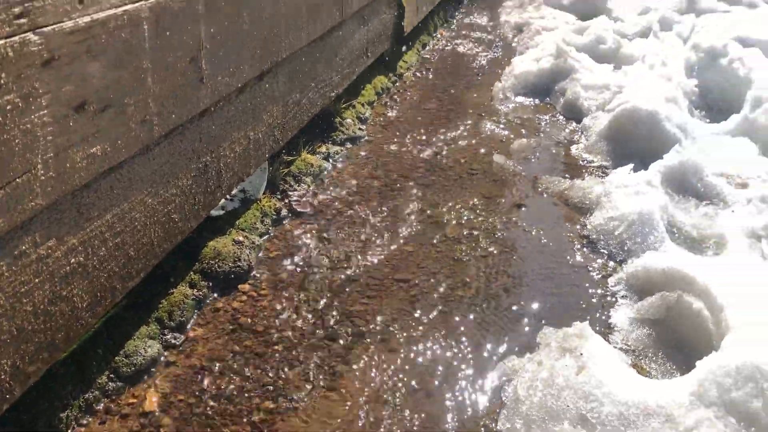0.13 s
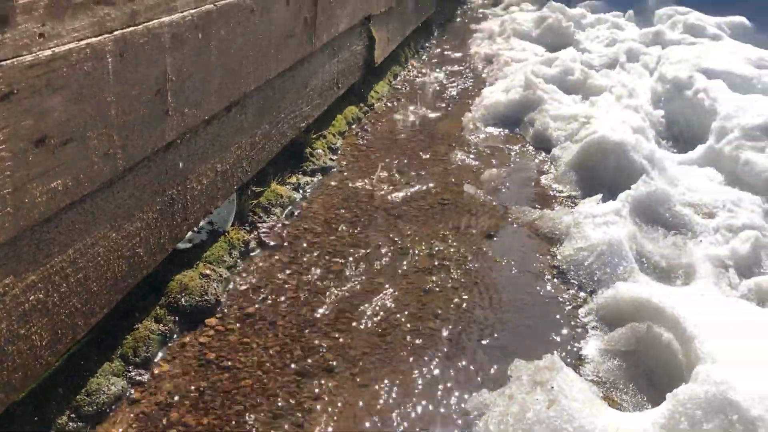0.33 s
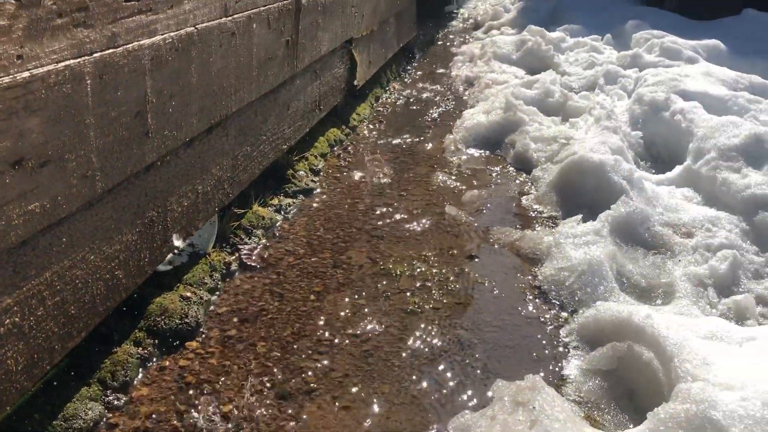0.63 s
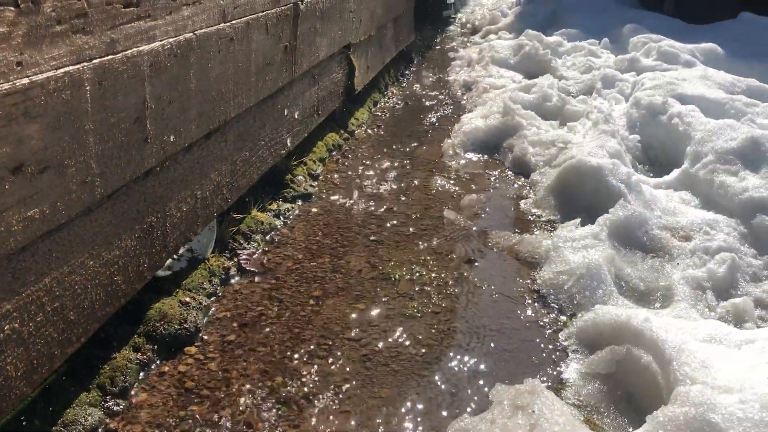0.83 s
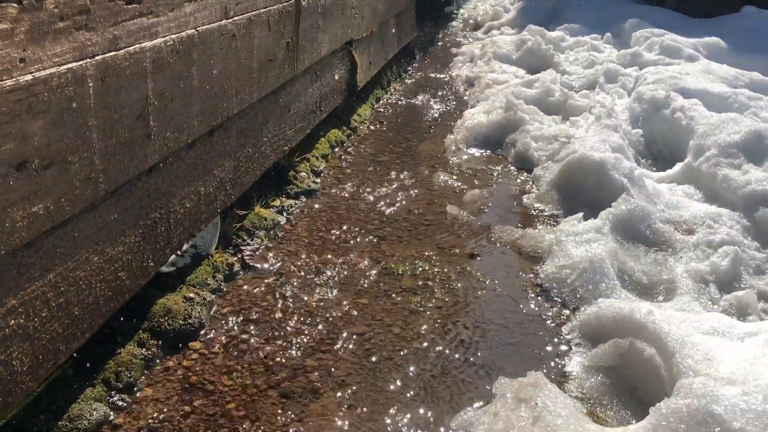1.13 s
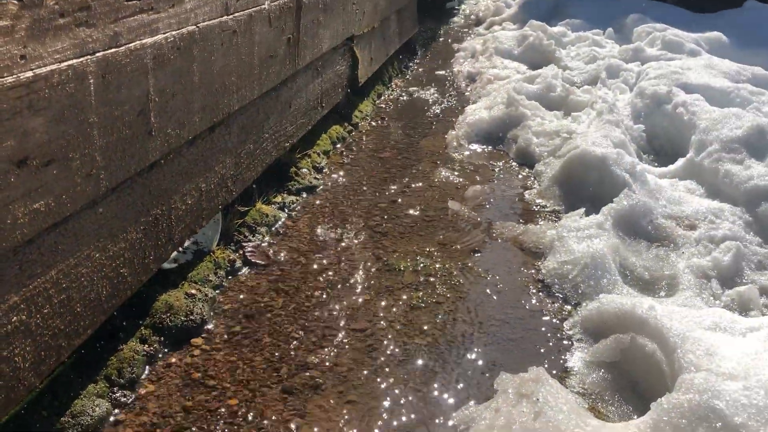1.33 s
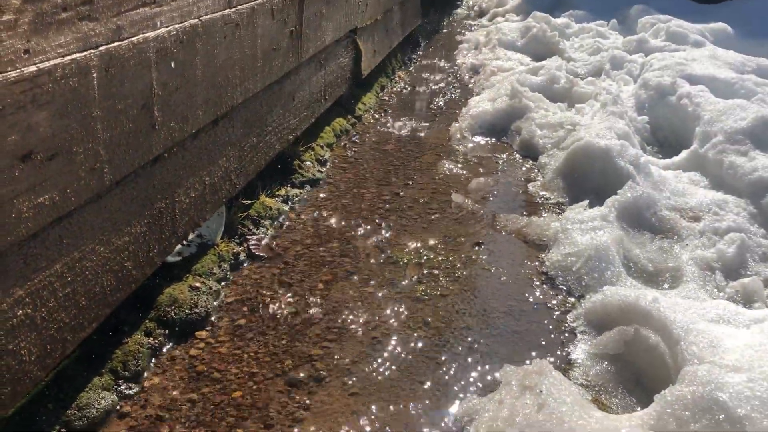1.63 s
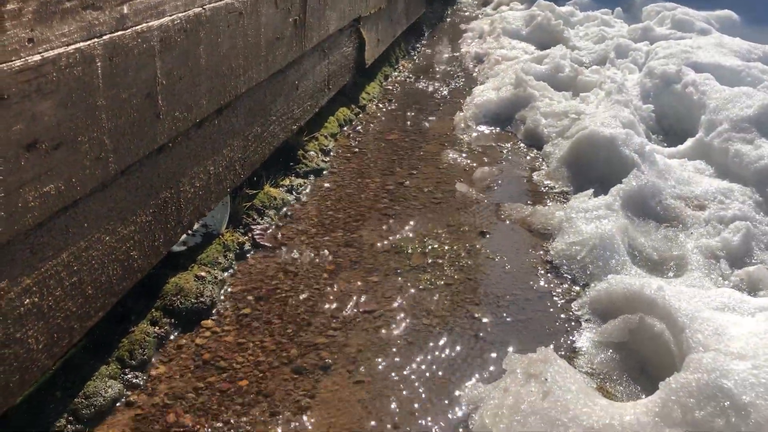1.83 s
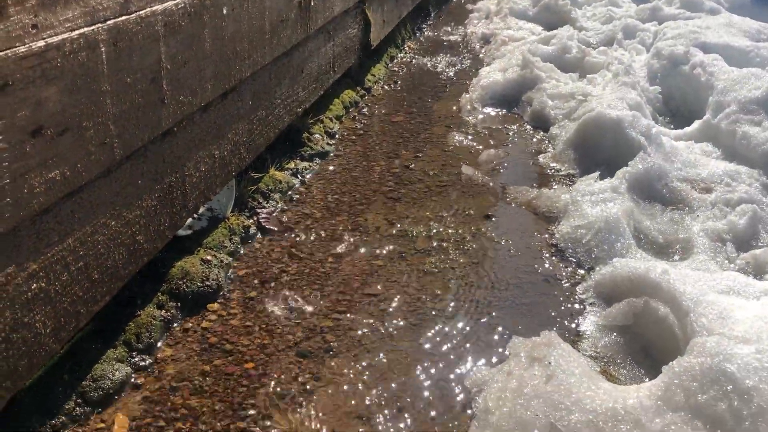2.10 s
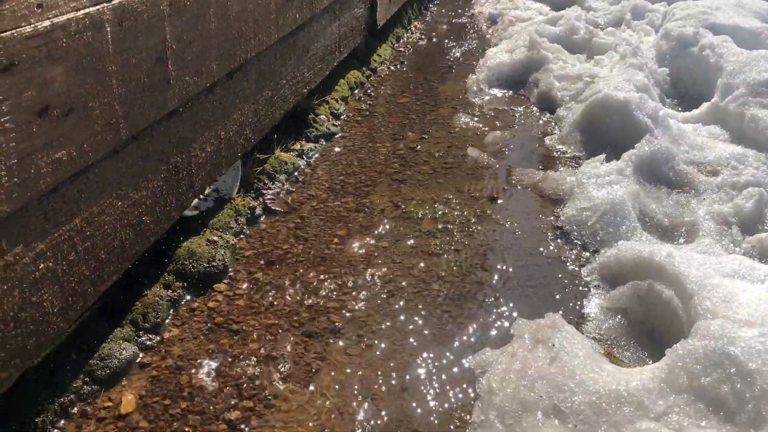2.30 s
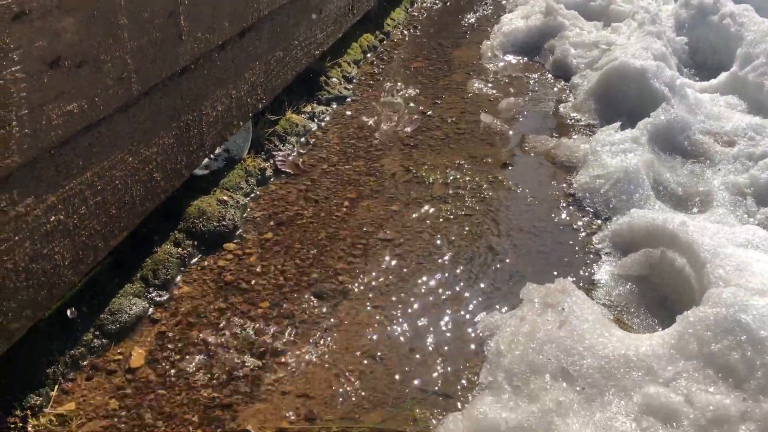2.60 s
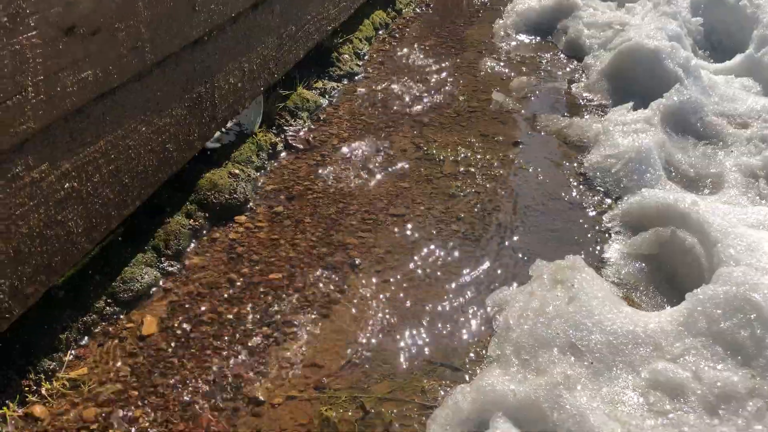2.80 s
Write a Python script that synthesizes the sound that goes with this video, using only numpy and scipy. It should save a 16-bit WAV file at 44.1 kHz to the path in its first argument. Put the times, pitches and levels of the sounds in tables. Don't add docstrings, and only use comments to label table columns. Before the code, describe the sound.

Meltwater drips rapidly into a shallow pebbly channel, crisp ticks and plinks, with faint birds

```python
import sys
import numpy as np
from scipy import signal
from scipy.fft import rfft, irfft
from scipy.io import wavfile
from scipy.ndimage import uniform_filter1d, map_coordinates

SR = 44100
rng = np.random.default_rng(int(sys.argv[2]) if len(sys.argv) > 2 else 0)


def to_wav(sig):
    pcm = np.clip(np.atleast_2d(sig), -1, 1) * 32767
    pcm = np.round(pcm).astype(np.int16)
    wavfile.write(sys.argv[1], SR, pcm.T)


def convert_level_to_amplitude(level_db):
    exponent = np.asarray(level_db, float) / 20
    return 10 ** exponent


N = 130095


def unit(x):
    return x / np.sqrt(np.mean(x ** 2) + 1e-20)


def along(points, hz):
    f, value = np.transpose(points)
    return np.interp(np.log(hz + 1), np.log(f + 1), value)


def wobble(rate):
    knots = rng.standard_normal(int(N * rate / SR) + 4)
    return map_coordinates(knots, [np.arange(N) * rate / SR])


def coloured(x, spectrum):
    m = 2 ** 12
    gain = convert_level_to_amplitude(along(spectrum, np.fft.rfftfreq(m, 1 / SR)))
    cepstrum = irfft(np.log(gain + 1e-6), m)
    cepstrum[1:m // 2] *= 2
    cepstrum[m // 2 + 1:] = 0
    response = irfft(np.exp(rfft(cepstrum)), m)[:m // 2]
    return signal.fftconvolve(x, response)[:N]


def rush(spectrum, patchy_db):
    z = signal.stft(rng.standard_normal(N + 512), nperseg=512)[2]
    patches = uniform_filter1d(rng.standard_normal(z.shape), size=6, axis=0)
    patches = uniform_filter1d(patches, size=10, axis=1)
    x = signal.istft(z * convert_level_to_amplitude(patchy_db * unit(patches)), nperseg=512)[1][:N]
    gain = convert_level_to_amplitude(along(spectrum, np.fft.rfftfreq(N, 1 / SR)))
    return unit(irfft(rfft(x) * gain, N))


def placed(s, grains):
    at = np.round(np.asarray(s) * SR).astype(int)[:, None] + np.arange(grains.shape[1])
    return np.bincount(at.ravel(), grains.ravel(), N + SR)[:N]


# pitch in Hz, loudness in dB per Hz of the road.
ROAD_COLOUR = [(120, -11.5), (200, -6), (333, -14), (530, -6.5), (657, -3.5), (882, 0), (1450, -13),
               (2710, -25.5), (3000, -31.5), (3900, -25), (6600, -120)]


def road():
    level_db = -55.5 + 0.41 * wobble(9.71)
    return convert_level_to_amplitude(level_db) * rush(ROAD_COLOUR, patchy_db=1.44)


# pitch in Hz, loudness in dB per Hz of the far water.
FAR_WATER_COLOUR = [(1290, -26), (2200, -14), (2770, -11.5), (5690, -5), (6490, -1), (7100, -10),
                    (7970, -1), (10800, -19.5), (15600, -18)]


def far_water():
    level_db = -66 + wobble(6) + 3.8 * wobble(180)
    return convert_level_to_amplitude(level_db) * rush(FAR_WATER_COLOUR, patchy_db=1.5)


# time in seconds, strength of the breeze in dB.
BREEZE_STRENGTH = [
    (0.0, -63),
    (0.35, -59.5),
    (.55, -71),
    (.8, -62.5),
    (1.3, -65.5),
    (1.6, -61.5),
    (1.82, -66),
    (2.1, -59.5),
    (2.55, -68),
    (2.95, -63.5),
]


def gust_db(s):
    return np.interp(s, *np.transpose(BREEZE_STRENGTH))


# pitch in Hz, loudness in dB per Hz of the wind rumble.
RUMBLE_COLOUR = [(16, -79), (30, -29), (71, -9.5), (114, -3), (269, -21), (330, -38), (430, -39),
                 (730, -120)]


def rumble():
    return convert_level_to_amplitude(-3 + gust_db(np.arange(N) / SR)) * rush(RUMBLE_COLOUR, patchy_db=4.5)


def puffs(s, db, pitch_spread):
    swings = 2.57
    hz = 118.8 * (1 + pitch_spread * rng.standard_normal(len(s))).clip(.5)
    u = np.arange(4000) / SR * hz[:, None] / swings
    thud = np.sin(2 * np.pi * swings * u) * u ** 2 * np.exp(-5.5 * u)
    thud *= convert_level_to_amplitude(db)[:, None] / np.abs(thud).max(axis=1, keepdims=True)
    return placed(s, thud)


def flutter(count=95):
    late = 0.303 * rng.standard_normal(count)
    s = np.abs(np.arange(count) + late) * N / SR / count
    db = gust_db(s) + 8.5 + 3.5 * rng.standard_normal(count)
    return puffs(s, db, pitch_spread=.25)


# start in seconds, peak level in dB.
BREEZE_THUDS = [(0.079, -40), (0.368, -41), (0.716, -42.5), (1.029, -47), (1.531, -38.5), (1.586, -45),
                (1.679, -40), (1.889, -42), (1.977, -42.5), (2.433, -44), (2.641, -49), (2.809, -43.5)]


def thuds():
    s, db = np.transpose(BREEZE_THUDS)
    return puffs(s, db - 2.5, pitch_spread=.07)


def bubbles(s, hz, db, cycles, size):
    rise, attack_s = 0.047, 0.00016
    t, hz = np.arange(size) / SR, hz[:, None]
    u = t * hz / cycles
    tone = np.sin(2 * np.pi * hz * t * (1 + rise * u))
    ring = tone * convert_level_to_amplitude(-60 * u) * (1 - np.exp(-t / attack_s))
    return placed(s, convert_level_to_amplitude(db)[:, None] * ring / np.abs(ring).max(axis=1, keepdims=True))


# pitch in Hz, gain in dB of a crack as it reaches the microphone.
CRACK_COLOUR = [(1200, -30), (2600, -1), (5000, 4), (6400, 8), (7050, -3), (7900, 7), (10500, -2),
                (15500, -3.5)]


def cracks(s, db, size):
    crack_t60_s, spray_t60_s, spray_db = .0036, .03, -19
    t = np.arange(size) / SR
    shape = convert_level_to_amplitude(-60 * t / crack_t60_s) + convert_level_to_amplitude(spray_db - 60 * t / spray_t60_s)
    burst = shape * rng.standard_normal((len(s), size))
    burst *= np.linalg.norm(shape) / np.linalg.norm(burst, axis=1, keepdims=True)
    return coloured(placed(s, convert_level_to_amplitude(db)[:, None] * burst), CRACK_COLOUR)


def patter(count=800):
    when, size, tone, shine = rng.random((count, 4)).T
    s = when * N / SR
    db = -71.5 - 2.5 * np.log(1 - .97 * size)
    hz = 6660 * 2 ** (1.8 * (tone - .5))
    ring = coloured(bubbles(s, hz, db - 8 * shine, cycles=22, size=400), CRACK_COLOUR)
    return ring + cracks(s, db - 0.5 - 8 * (1 - shine), size=700)


def flock(calls, shake, bend):
    direct, echo_t60_s, far_echo_db, far_echo_t60_s = .3, .15, -20, .6
    t = np.arange(SR // 3) / SR
    echo_fade = convert_level_to_amplitude(-60 * t / echo_t60_s) + convert_level_to_amplitude(far_echo_db - 60 * t / far_echo_t60_s)
    out = np.zeros(N + 2 * SR)
    for s, length, from_hz, to_hz, db in calls:
        start = round(s * SR)
        u = np.linspace(0, 1, 2 + int(length * SR))
        hz = to_hz + (from_hz - to_hz) * (1 - u) ** bend
        hz = hz * (1 + shake[start:][:len(u)])
        swell = np.abs(np.sin(np.pi * u)) ** .5
        note = convert_level_to_amplitude(db) * np.sin(2 * np.pi * np.cumsum(hz) / SR) * swell
        echoes = rng.standard_normal(len(t)) * echo_fade
        echoes /= np.linalg.norm(echoes)
        echoes[0] += direct
        heard = signal.fftconvolve(note, echoes)
        out[start:][:len(heard)] += heard
    return out[:N]


# start in seconds, length in seconds, first pitch in Hz, last pitch in Hz, level in dB.
BUZZY_CHIRPS = [
    (.6, 0.12, 3850, 3210, -58),
    (.03, 0.05, 4800, 5660, -58),
    (1.165, 0.082, 2500, 4710, -59.5),
    (1.585, 0.082, 5800, 4900, -60),
    (1.605, 0.11, 4300, 3600, -55.5),
    (1.92, .08, 3010, 4520, -60.5),
    (1.48, 0.041, 3600, 3000, -62.5),
    (2.35, .06, 2800, 3800, -66),
]


def buzzers():
    return flock(BUZZY_CHIRPS, .09 * wobble(350), bend=1.4)


# start in seconds, level in dB, bubble pitch in Hz.
FAINT_TICKS = [(0.044, -46, 6560), (0.0476, -47.5, 8000), (0.0685, -45.0, 6400), (0.0868, -48.0, 6400),
               (0.1192, -44, 7700), (0.1244, -48, 8800), (0.1304, -51, 8100), (0.204, -47, 7800),
               (0.2476, -49, 7800), (0.284, -49, 7300), (0.346, -50, 7450), (0.4445, -49, 9500),
               (0.4538, -43, 8200), (0.46, -45, 6700), (0.5767, -44, 5900), (0.6647, -43, 5950),
               (0.6773, -47.5, 8200), (0.7795, -47, 6450), (0.795, -46, 8300), (0.807, -51, 7800),
               (0.8868, -43.5, 9600), (0.911, -47.0, 7450), (0.935, -52, 8250), (1.1094, -44, 7900),
               (1.2425, -44, 6550), (1.2731, -50.5, 8950), (1.3925, -46.5, 7900), (1.4398, -46, 7800),
               (1.4543, -43, 6500), (1.4985, -46, 9700), (1.5137, -44, 8400), (1.567, -49, 8150),
               (1.5997, -46.5, 7900), (1.739, -44.0, 7700), (1.8263, -52, 7900), (1.9214, -48, 7800),
               (1.9905, -40, 7800), (1.9959, -41, 6600), (2.052, -37, 8400), (2.169, -44, 7900),
               (2.181, -43, 5900), (2.2725, -55, 6500), (2.4154, -41, 8150), (2.5085, -46, 8000),
               (2.5184, -44.0, 8000), (2.719, -48, 10700), (2.7377, -48.5, 6560), (2.772, -46.0, 7900),
               (2.7785, -44.5, 6400), (2.787, -43, 8700), (2.8004, -52, 7760), (2.823, -45.5, 8200),
               (2.8418, -49, 8100), (2.885, -44, 9700), (2.894, -39, 6900), (2.9091, -42, 8100),
               (2.9131, -41, 9400), (2.927, -46, 6240)]


def ticks():
    s, db, hz = np.transpose(FAINT_TICKS)
    return cracks(s, db - 6.5, size=900) + bubbles(s, hz, db - 2.5, cycles=46, size=500)


# start in seconds, length in seconds, first pitch in Hz, last pitch in Hz, level in dB.
BIRD_SLURS = [
    (.562, 0.052, 5900, 5600, -52),
    (.598, 0.13, 5350, 4620, -50),
    (0.1, 0.088, 3400, 3800, -68),
    (0.047, 0.0443, 6100, 6480, -49.5),
    (2.158, 0.036, 5750, 5000, -47.5),
    (2.188, .1, 5300, 4500, -49),
    (2.305, 0.066, 6100, 6450, -55),
]


def slurrers():
    return flock(BIRD_SLURS, .045 * wobble(500), bend=1.4)


# start in seconds, crack level in dB, bubble pitch in Hz, bubble
# level in dB.
CLEAR_DROPS = [(0.17, -54, 6270, -38.5), (0.3282, -44.5, 7900, -44), (0.3561, -63, 10500, -45),
               (0.4255, -45, 11500, -61), (0.7212, -40, 8460, -33.5), (0.975, -36.5, 6500, -36.5),
               (0.995, -38, 7750, -34.5), (1.087, -46.5, 8650, -38.5), (1.135, -43.5, 4340, -42.5),
               (1.2141, -51, 6300, -38.5), (1.3547, -54, 6500, -44), (1.4909, -48.5, 6220, -36.5),
               (1.7933, -49, 8400, -29), (1.8734, -53, 7720, -50), (1.9513, -60, 9750, -36.5),
               (2.057, -54, 7810, -29.5), (2.1103, -44.5, 3550, -37.5), (2.148, -60, 8300, -40),
               (2.241, -53, 8460, -41), (2.2999, -44.5, 8230, -45), (2.3058, -52, 8300, -37.5),
               (2.3956, -40, 6160, -33.5), (2.4203, -47.5, 7970, -46), (2.569, -53, 7900, -46),
               (2.6003, -37, 7640, -39), (2.6085, -45, 4580, -36), (2.6587, -47.5, 8000, -32.5),
               (2.6582, -62, 6300, -35), (2.8761, -45, 7940, -33),
               (0.0954, -43, 3440, -40.5), (0.147, -72.5, 6650, -47), (0.29, -45.5, 6500, -39.5),
             (0.5028, -51, 4760, -37.5), (0.6364, -45, 8100, -45), (0.8678, -61, 5080, -42),
             (1.0172, -52, 8600, -45.5), (1.0815, -54, 7430, -38), (1.152, -43, 6470, -44),
             (1.232, -63, 7300, -42), (1.2385, -46, 6420, -47), (1.3636, -66, 7900, -55),
             (1.3863, -45.5, 5940, -57), (1.522, -49, 7640, -43), (1.586, -59, 6300, -44.5),
             (1.6216, -57, 7750, -45.5), (1.8194, -72, 7940, -47), (1.962, -47, 9200, -57),
             (2.0275, -49, 6400, -48), (2.153, -42.5, 6380, -43.5), (2.1894, -48, 2280, -68),
             (2.213, -70, 7760, -43), (2.3215, -44.5, 6200, -43), (2.49, -57, 6500, -48),
             (2.5404, -68, 8660, -51), (2.7532, -49, 8840, -46), (2.8456, -53, 7450, -44.5),
             (2.943, -53, 9300, -46),
               (0.3746, -49, 7050, -43.5), (0.7318, -41, 4120, -40.5), (0.7985, -47, 6430, -44.5),
                (0.879, -61, 8700, -48), (0.8961, -47, 7850, -43), (0.904, -50.5, 8100, -47),
                (1.144, -56, 6200, -42), (1.5496, -58, 6400, -43), (1.616, -51, 7750, -50),
                (1.707, -49, 3560, -46), (1.7138, -50, 10700, -51), (1.7926, -42, 4780, -39.5),
                (2.1233, -52, 7900, -53), (2.68, -51, 4500, -46), (2.9225, -46, 5740, -42),
                (.556, -60, 3600, -55), (.521, -61, 6000, -49), (2.801, -51.5, 3940, -53)]


def drops():
    s, crack_db, hz, db = np.array(CLEAR_DROPS).T
    return cracks(s, crack_db + 3.5, size=1300) + bubbles(s, hz, db + 0.5, cycles=37, size=700)


# start in seconds, level in dB, bubble pitch in Hz.
SLOW_BUBBLES = [
    (0.376, -47.5, 2260),
    (0.7827, -50.5, 3500),
    (0.9352, -50.5, 3000),
    (1.1718, -46, 3090),
    (1.242, -49.5, 1770),
    (2.1894, -45.5, 2420),
    (2.2994, -51, 3070),
    (2.4041, -47, 2560),
    (2.4853, -45.5, 2220),
    (2.9044, -46, 2750),
]


def plinks():
    s, db, hz = np.transpose(SLOW_BUBBLES)
    return cracks(s, db - 11, size=700) + bubbles(s, hz, db - 1.5, cycles=58, size=1500)


# start in seconds, length in seconds, first pitch in Hz, last pitch in Hz, level in dB.
DROOPING_WHISTLE = [
    (2.44, 0.28, 5560, 4290, -62),
    (2.655, .125, 4314, 4260, -57.5),
    (2.77, 0.093, 4295, 4250, -66),
]


def drooper():
    return flock(DROOPING_WHISTLE, .045 / 4 * wobble(200), bend=0.62)


def wall_echo(water):
    delay_s = 0.0028
    return convert_level_to_amplitude(-13.5) * np.roll(water, round(delay_s * SR))


def scene():
    distance = road() + far_water()
    breeze = rumble() + flutter() + thuds()
    water = patter() + ticks() + drops() + plinks()
    birds = buzzers() + slurrers() + drooper()
    return (distance + breeze + water + wall_echo(water) + birds)[None]


def top_cut(x):
    return signal.sosfilt(signal.butter(12, 16670, fs=SR, output="sos"), x)


def record(dry):
    top_hz = 15850
    gain = np.where(np.fft.rfftfreq(N, 1 / SR) < top_hz, 1, convert_level_to_amplitude(-24))
    mix = irfft(rfft(dry) * gain, N)
    return top_cut(mix)


dry = scene()
out = record(dry)
to_wav(out)
```